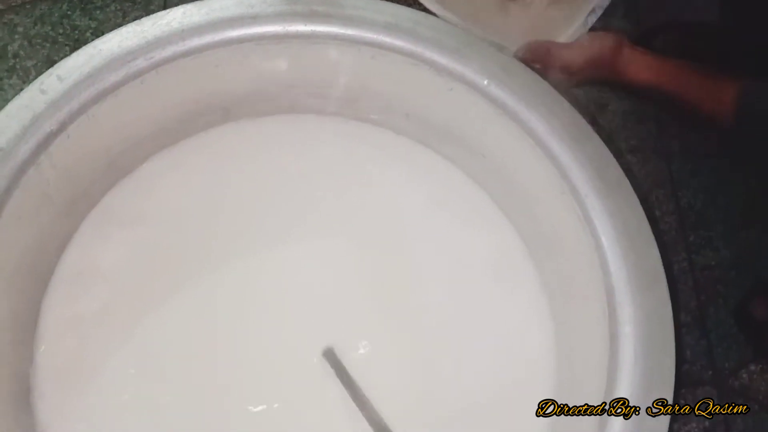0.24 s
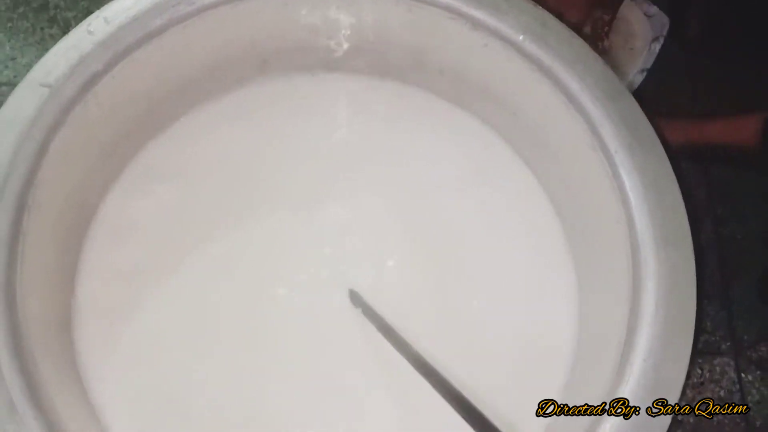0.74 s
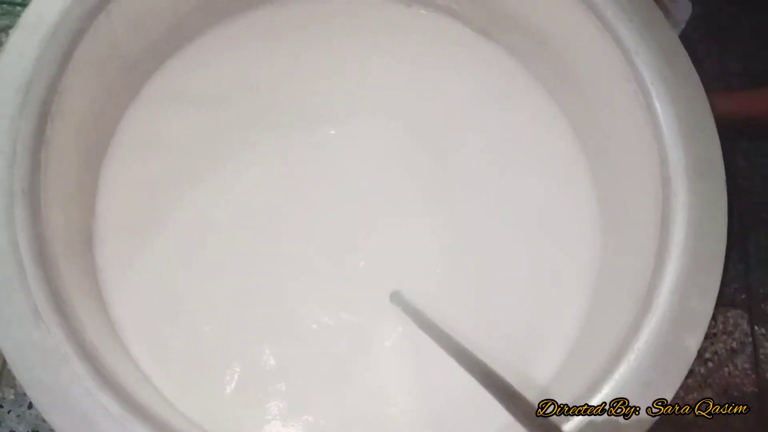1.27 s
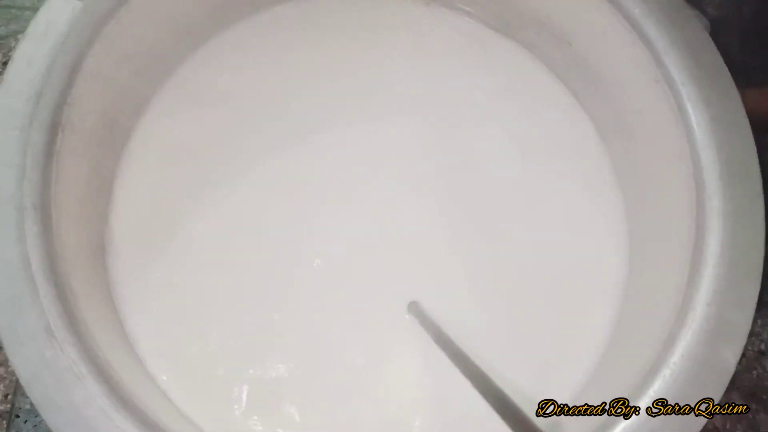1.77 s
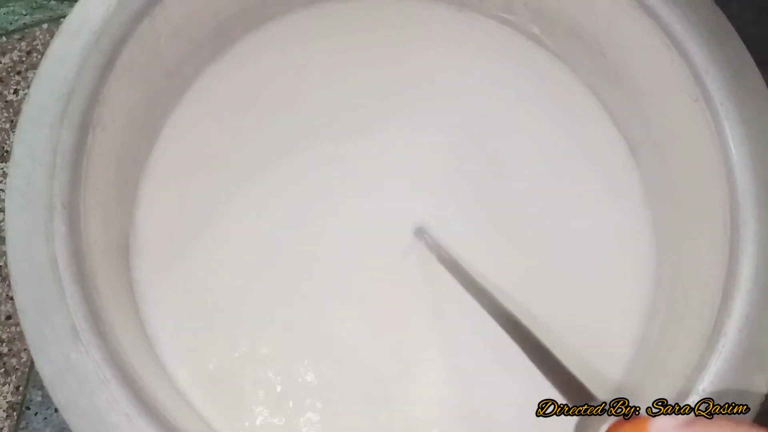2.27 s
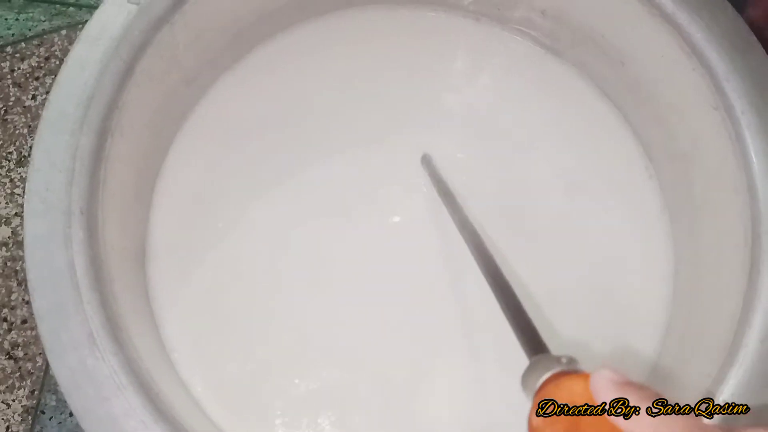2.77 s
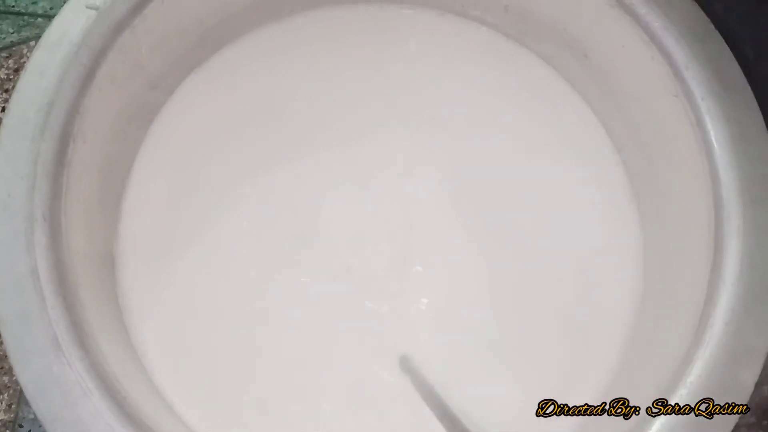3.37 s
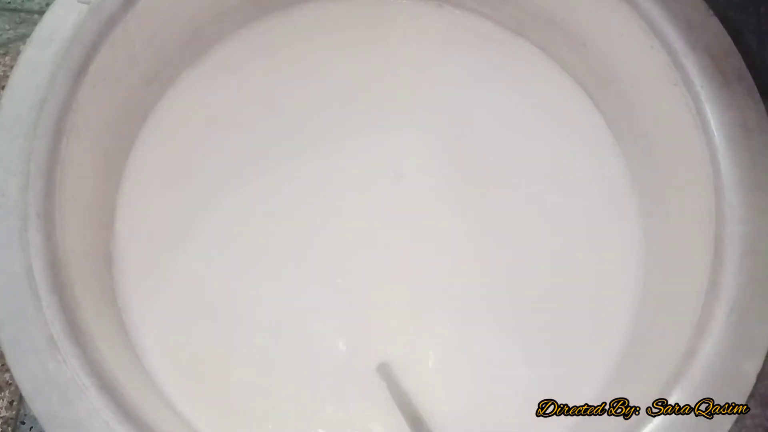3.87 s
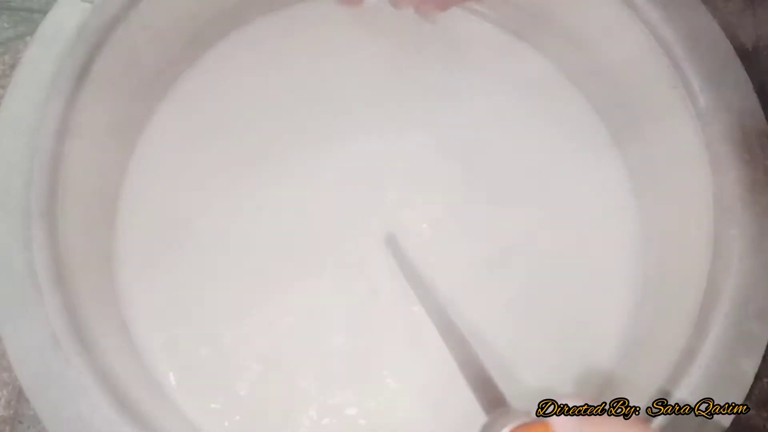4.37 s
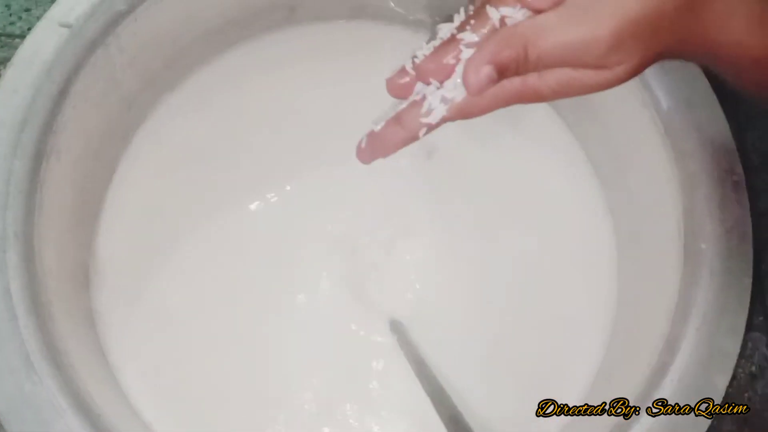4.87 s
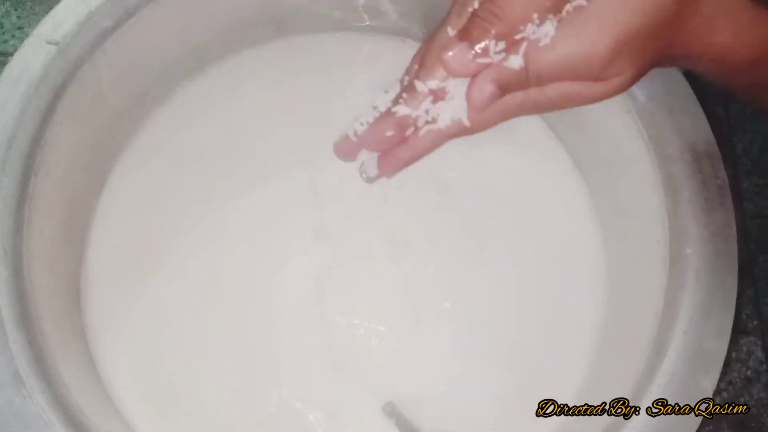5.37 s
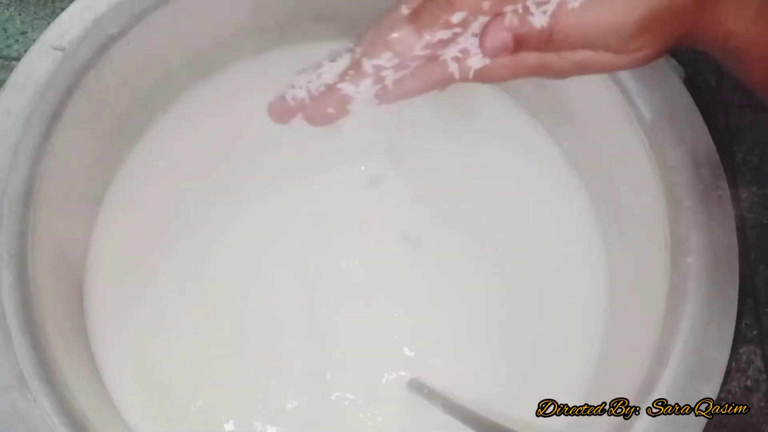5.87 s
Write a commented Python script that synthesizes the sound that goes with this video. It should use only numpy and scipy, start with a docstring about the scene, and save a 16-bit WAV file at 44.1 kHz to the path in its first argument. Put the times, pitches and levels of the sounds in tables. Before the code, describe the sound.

Close stereo pickup in a small hard-walled room. A gas burner hisses steadily over a low pot murmur. A hand rubs wet rice in a metal basin, then knocks ring its rim and a full pot rattles dully. Bumpy sweeps follow, then watery plinks and small taps, more crunchy strokes, sharp clicks between short rubs, and a final sweep running into the end.

```python
"""A small hard-walled room: the steady hiss of a burner and the murmur of a pot of hot milk lie under it all.
Beside the pot a hand sweeps and presses soaked rice in a metal basin: grains crunch, skin judders, clumps splat.
Early knocks ring the rim and rattle the full pot; after the second spell of sweeps, drops plink and the side is tapped.
More strokes follow, then clicks and plinks between short strokes, and a last sweep runs into the end.
Rice is showers of clicks through coloured responses; knocks are decaying modes, drops rising sines, the flame noise."""
import sys
import numpy as np
from scipy import signal
from scipy.fft import rfft, irfft
from scipy.io import wavfile
from scipy.ndimage import uniform_filter1d, map_coordinates

SR = 44100
rng = np.random.default_rng(int(sys.argv[2]) if len(sys.argv) > 2 else 0)


def bounce(signal):
    """Save signal as a 16-bit WAV file at the path given by the first command-line argument."""
    frames = np.transpose(np.atleast_2d(signal))
    limited = np.clip(frames, -1, 1)
    pcm = np.round(limited * 32767).astype(np.int16)
    wavfile.write(sys.argv[1], SR, pcm)


N = 270310
TIME = np.arange(N) / SR   # s
RESPONSE_SIZE = 32768   # samples

# Throughout, left-right dB is positive towards the left, and levels in dB come before the shared trims.

# Diffuse sound at the two microphones. Each row: frequency in Hz, left-right correlation.
DIFFUSE_CORRELATION = [(100, 0.95), (300, 0.76), (700, 0.31), (1300, 0.004), (3000, -0.2), (8000, 0.024)]
# Dying of the small room. Each row: frequency in Hz, time to fall by 60 dB in s.
ROOM_T60 = [(100, 0.47), (260, 0.4), (700, 0.42), (1840, 0.15), (4850, 0.071)]
# Colour of the steady burner. Each row: frequency in Hz, relative density in dB per Hz.
BURNER_COLOUR = [(25, -28), (60, 0.5), (100, 5.5), (160, 6.5), (230, -4.5), (500, -10), (750, -13.5),
                 (1100, -11.5), (1600, -13), (2000, -7.5), (2330, 3.5), (2650, -9), (2950, -3.5),
                 (3400, -14.5), (4400, -13), (5400, -15.5), (6700, -16), (8000, -20), (15000, -44.5)]
# Place of the burner. Each row: frequency in Hz, left-right in dB.
BURNER_PAN = [(100, -0.5), (700, 1.5), (1400, -4.5), (2400, -7), (4500, -7.5), (6700, 3.5)]
BURNER_DB = -51.5
# Faint fizzling ticks in the high treble. Each row: start in seconds, level in dB, decay to 1/e in s.
TICKS = [(1.332, -42, 0.0042), (2.66, -47, 0.071), (3.098, -50, 0.012), (4.924, -41.5, 0.0081),
         (5.301, -37, 0.0061), (5.32, -45, 0.037), (5.362, -49, 0.0027), (5.965, -54, .025)]
# Milk runs off the rice between sweeps. Each row: start in seconds, end in seconds, level in dB.
TRICKLES = [(2.3, 3.203, -60), (2.895, 3.14, -64), (3.188, 3.47, -54), (4.652, 4.943, -64.5),
            (5.27, 5.592, -59.5)]
TRICKLE_FADE_S = 0.02
SQUELCH_DB = -16   # tiny bubbles against the crunch of a sweep
# Drops and clumps that trap air in wet rice and milk; the shortest are mere clicks.
# Each row: start in seconds, bubble pitch in Hz, peak in dB, cycles to fall by 60 dB.
DRIPS = [(0.866, 996, -48, 175.5), (2.808, 1830, -35, 54), (2.89, 1132, -35, 106), (2.908, 1074, -35.5, 62),
         (2.925, 2690, -33, 27), (2.924, 813, -40.5, 69), (2.942, 894, -39, 54), (2.969, 1060, -35, 76),
         (2.985, 1160, -35.5, 58), (3.004, 1070, -43, 70), (3.04, 2980, -35, 33), (3.116, 1084, -39.5, 37),
         (3.174, 1960, -38, 26), (3.278, 2350, -25.5, 30), (3.421, 2560, -28, 30), (3.445, 2630, -26.5, 31),
         (4.048, 1390, -21.5, 21), (4.048, 3920, -27.5, 52), (4.072, 3870, -29.5, 49),
         (4.751, 2970, -22, 9.5), (4.751, 4660, -21.5, 18), (4.912, 1836, -26, 55), (4.934, 1780, -27, 22),
         (4.956, 1410, -25.5, 20), (4.975, 432, -22, 35), (5.362, 2040, -25, 39), (5.363, 3000, -19, 14),
         (5.362, 4800, -11.5, 5)]
# Something hard knocks on the full pot and rattles.
# Each row: start in seconds, level in dB, brightness in dB per octave.
POT_KNOCKS = [(1.583, -23.5, -2.5), (1.595, -40.5, 0), (1.606, -49, 1.5), (1.616, -44, 6),
              (1.627, -49.5, 4.5), (1.641, -43, 0), (1.6565, -36.5, -5.5), (1.672, -39.5, -1),
              (1.686, -50.5, 6), (2.131, -48, -12)]
# Modes of the full pot. Each row: frequency in Hz, level in dB, time to fall by 60 dB in s.
POT_MODES = [(172, -5.5, 0.2), (224, -1.5, 0.11), (302, 0, 0.083), (491, -14, 0.12), (813, 3, 0.065),
             (1064, -8.5, 0.044), (1220, -1.5, .04), (1464, 3.5, 0.052), (1680, -2.5, .04),
             (1870, -4.5, 0.036), (2230, -2, 0.035), (2320, -13.5, 0.03), (2690, -7, 0.032),
             (2830, -25, 0.077)]
# Something small and hard taps the basin's side and bounces.
# Each row: start in seconds, level in dB, brightness in dB per octave.
SIDE_TAPS = [(3.175, -54, 4), (3.2115, -31, 0), (3.216, -38, 4), (3.2305, -39, 8), (3.2355, -43, -1)]
# Modes of the basin's side. Each row: frequency in Hz, level in dB, time to fall by 60 dB in s.
SIDE_MODES = [(306, -15.5, 0.22), (448, -1.5, 0.081), (567, 1.5, 0.039), (1841, 0.5, 0.039),
              (2030, -7, 0.044), (2320, 1.5, 0.036), (2460, -3, 0.023), (2720, -13, .025)]
# Knocks that reach the basin's rim and set its long notes singing.
# Each row: start in seconds, level in dB, brightness in dB per octave, peak of the longest note in dB.
RIM_KNOCKS = [(0.472, -38.5, -5, -33), (0.843, -55.5, 1, -57.5), (1.0942, -35.5, 0.5, -66),
              (1.114, -31.5, -2.5, -39), (4.968, -31, -5, -54)]
# Modes of the rim. Each row: frequency in Hz, level in dB, time to fall by 60 dB in s.
RIM_MODES = [(371.3, -9.5, 0.35), (447.4, 2.5, 0.17), (623, 0, 0.12), (661.4, 3.5, 0.13), (853, -12, 0.31),
             (1251, -1, 0.064), (1705, 2, 0.089), (1850, -10.5, 0.18), (1820, 2, 0.14), (2140, -1, 0.095),
             (2580, -13, 0.13), (2650, -5.5, 0.16), (3700, -7, 0.15)]
RIM_NOTE_HZ, RIM_NOTE_T60_S = 700, 0.61   # its strength depends on where the rim is hit
# A rubbing finger makes one of the basin's notes sing.
# Each row: start in seconds, end in seconds, pitch in Hz, level at the end in dB.
SINGING = [(0.29, 0.454, 730, -43.5), (2.08, 2.107, 2940, -38), (2.355, 2.556, 762, -38),
           (3.783, 3.85, 770, -38.5), (3.822, 3.944, 780, -37.5), (4.427, 4.477, 1793, -37),
           (5.245, 5.326, 710, -47), (5.813, 6.05, 787, -43)]
# The basin's ring under every contact.
# Each row: frequency in Hz, energy in dB before the contact's colour, time to fall by 60 dB in s.
BASIN_MODES = [(177.7, -8, 0.11), (305, -18.5, 0.43), (392.6, -8, 0.047), (580.7, -11, 0.055),
               (710, -9.5, 0.44), (817, -13.5, 0.14), (945, -15.5, 0.06), (1276, -17.5, 0.08),
               (1779, -15, 0.12), (1913, -15.5, 0.14), (2047, -10.5, 0.078), (2407, -9.5, 0.095),
               (2653, -20, 0.06), (2940, -16.5, 0.19), (3790, -25, 0.4)]
# Colours of push, scrape, crunch and fizz, one list each. Each row: frequency in Hz, level in dB.
CONTACT_COLOURS = [
    [(40, -41.5), (95, -15.5), (170, -1.5), (330, 8), (420, 1.5), (500, -1), (590, -8.5), (830, -7),
     (1100, -51), (4000, -85.5)],
    [(300, -28), (480, -10), (620, -1), (790, 1), (980, -8.5), (1300, -5.5), (1520, -12.5), (1800, -11),
     (2300, -61), (7000, -84)],
    [(1100, -35.5), (1550, -25), (1800, 1), (2400, 3), (3000, -2.5), (3500, -12), (5000, -60), (10000, -78)],
    [(2200, -17.5), (3150, -1.5), (3750, 3.5), (4600, 1), (5300, -7.5), (6700, -10.5), (8000, -31.5),
     (10000, -54), (15000, -69)],
]
# Push, scrape, crunch and fizz. Each row: grains per second in the spatter of a blow, spread of their sizes in dB,
# stroke trim in dB, blow trim in dB, near reflections in dB, room in dB, share of the pan from 0 to 1.
CONTACT_RANGES = [(487, 8, -9.5, -0.5, 0, -2, 0.02), (970, 3.5, -9.5, -1, 2, 1.5, 0.09),
                  (1430, 2.5, -5, 2.5, 6.5, 0, 0.94), (1910, 9.5, 0.5, 1.5, 15, 1, 0.8)]
# The hand sweeps through the rice.
# Each row: start in seconds, end in seconds, push in dB, scrape in dB, crunch in dB, fizz in dB.
SWEEPS = [(-0.06, 0.456, -30.5, -29, -30, -49.5), (0.046, 0.428, -65, -49.5, -50, -45),
          (1.887, 2.265, -25, -33.5, -41.5, -55.5), (2.232, 2.722, -27.5, -28, -35, -45),
          (3.415, 3.645, -39.5, -31, -36.5, -49), (3.737, 4.017, -50.5, -29.5, -46, -55),
          (3.897, 4.473, -25, -30.5, -33, -46), (4.247, 4.488, -32.5, -33.5, -66.5, -68),
          (4.407, 4.468, -22, -11, -32.5, -59), (4.968, 5.231, -43, -30.5, -35, -46.5),
          (5.14, 5.298, -34, -47, -58, -70), (5.762, 6.111, -30, -30.5, -37.5, -49.5)]
SWEEP_ATTACK_S, SWEEP_RELEASE_S = 0.091, 0.016
SWEEP_ARCH_DB = 8.5   # a sweep is this much weaker at its ends than in its middle
FIZZ_FADE_DB = 4.5   # the fizz sinks over a sweep
RUB_GRAINS_PER_S, RUB_SPREAD_DB = 8000, 2.0   # a stroke moves many small grains at once
WANDER_S, WANDER_PER_S = 0.000487, 14   # the moving hand makes the rubbed resonances wander: delay spread, rate
STROKE_PAN_DB = -8
# The palm presses down, and wet skin sticks and slips on the basin.
# Each row: start in seconds, end in seconds, pitch in Hz, final level in dB, swell in dB, share of tone from 0 to 1.
PRESSES = [(0.0, 0.323, 401.4, -38, -2.5, 0.6), (0.0, 0.3, 202.4, -41.5, -3.5, 0.15),
           (0.075, 0.388, 579, -47.5, -5, 0.75), (0.407, 0.488, 290.4, -33, -4, 0.15),
           (2.016, 2.173, 140, -39, 7, 0.4), (1.914, 2.185, 222.8, -26.5, -5, 0.22),
           (1.94, 2.035, 325.7, -27.5, -0.5, 0.7), (2.2, 2.6, 172, -39, 10, 0.72),
           (3.435, 3.585, 339.5, -28.5, 15.5, 0.29), (3.777, 3.944, 335, -24.5, 5, 0.16),
           (4.147, 4.455, 606.5, -41.5, 2, 0.8), (4.3, 4.45, 225.5, -18, 9.5, 0.51),
           (5.089, 5.147, 339.3, -30.5, 9, 0.56)]
PRESS_ATTACK_S, PRESS_RELEASE_S = 0.036, 0.048
PRESS_SCRAPE_DB = -17.5   # scrape against the rough part of a press
# Clumps of wet rice land.
# Each row: start in seconds, level in dB, brightness in dB per range, left-right in dB before the range's share.
SPLATS = [(0.471, -25, -0.5, -7.5), (0.8426, -45, 6, -12.5), (1.094, -26.5, 4, -4.5),
          (1.114, -29, -3.5, -5), (1.164, -34.5, -7.5, 0), (1.5834, -31.5, -0.5, -3), (1.598, -34, -3, -1),
          (1.615, -40.5, -4, -6), (1.634, -39, -2, -5), (1.6577, -42, -8, -3), (1.673, -45, -9, 1),
          (3.2115, -34.5, 3, -21), (4.448, -28, -4.5, -15.5), (4.466, -38, -3, -9), (4.9675, -28, -1, -7),
          (4.987, -31.5, -7, -14)]
# The hand bumps the basin.
# Each row: start in seconds, level in dB, brightness in dB per range, left-right in dB before the range's share.
BUMPS = [(1.232, -52, -3, 4.5), (1.954, -36.5, 2, -10), (1.983, -32.5, 5, -8), (1.9925, -30, -3, -11),
         (2.034, -31, -3.5, -0.5), (2.0798, -22, 0, -8), (2.1012, -22, 1.5, -7), (2.131, -27, -4, -10),
         (2.1655, -29, 2, -4), (3.8717, -43.5, 2.5, -16), (3.9131, -33, 2.5, -3), (3.936, -36.5, 4.5, -7.5),
         (4.3955, -31.5, 1.5, -6.5)]
# Single wet grains snap.
# Each row: start in seconds, level in dB, brightness of the fizz in dB, left-right in dB before the range's share.
SNAPS = [(2.6081, -31, -36, -23), (2.9513, -52, -33, -15), (3.099, -58, -3, -5), (3.1748, -47, -27, -8),
         (3.2305, -36, -26, -2), (3.279, -40.5, -17, -1), (3.359, -40.5, -26, -17),
         (3.4212, -47.5, -11, -8), (3.4452, -53, -4, -18), (3.474, -35.5, -16, -11),
         (4.7517, -37.5, -12.5, -4), (4.8684, -75.5, 19, -5), (5.0959, -37.5, -8.5, -10),
         (5.5224, -42, -20, -18)]
# Make-up of a splat: push, scrape, crunch and fizz in dB as a group, then spatter in dB.
SPLAT_KIND = ((-1.5, 0.5, -0.5, -10), -7.5)
# Make-up of a bump: push, scrape, crunch and fizz in dB as a group, then spatter in dB.
BUMP_KIND = ((9.5, -0.5, -6, -19), -22.5)
# Make-up of a snap: push, scrape, crunch and fizz in dB as a group, then spatter in dB.
SNAP_KIND = ((-10.5, -6, -5.5, 5.5), -0.55)
PATTER_PER_S, PATTER_DB = 79, 5   # stray grains fall with a trickle; level against it
PATTER_FIZZ_DB = -6.5   # fizz of a stray grain against its crunch
BASIN_LOW_HZ = 72   # the basin radiates little below this
MIC_LAG_S = .00005   # the left microphone is a little farther from the basin
MIC_CUT_HZ, CUTOFF_HZ = 7500, 15500


def from_db(db):
    """Turns decibels into gain."""
    return 10 ** (np.asarray(db) / 20)


def rms_one(x):
    """Scales a signal to rms 1."""
    return x / np.sqrt(np.mean(x ** 2) + 1e-20)


def at_hz(points, hz):
    """Reads a table on a log-frequency axis."""
    table_hz, value = np.transpose(points)
    return np.interp(np.log(np.maximum(hz, 1)), np.log(table_hz), value)


def panned(left_right_db):
    """Gains of the two channels, mean 1."""
    gains = from_db(np.array([[.5], [-.5]]) * left_right_db)
    return gains / gains.mean()


def drift(rate):
    """Smooth chance of about unit spread, with a new random knot `rate` times a second."""
    knots = rng.standard_normal(8192)
    curve = map_coordinates(knots, [TIME[::32] * rate], order=3, mode="wrap")
    return rms_one(curve).repeat(32)[:N]


def lagged(x, lag_s):
    """Reads a signal shifted by a small, possibly moving lag."""
    return map_coordinates(x, [np.arange(len(x)) - lag_s * SR], order=1)


def envelope(start, end, attack_s, release_s):
    """Straight attack, hold and exponential release."""
    attack = np.clip((TIME - start) / attack_s, 0, 1)
    return attack * np.exp(-np.maximum(TIME - end, 0) / release_s)


def progress(start, end):
    """Runs from 0 to 1 over a gesture."""
    return np.clip((TIME - start) / (end - start), 0, 1)


def grains(per_s, spread_db):
    """Random clicks of uneven size, evened to a local rms near 1."""
    sizes = from_db(spread_db * np.minimum(rng.exponential(1, N), 4)) * rng.choice([-1, 1], N)
    clicks = sizes * (rng.random(N) < per_s / SR)
    local_power = uniform_filter1d(clicks ** 2, size=2048)
    return clicks / np.sqrt(np.maximum(local_power, 1e-4))


def diffuse(size):
    """Frequencies and spectrum of stereo noise: alike in the bass, nearly unrelated in the treble."""
    hz = np.fft.rfftfreq(size, 1 / SR)
    alike = np.clip(at_hz(DIFFUSE_CORRELATION, hz), -1, 1)
    mid, side = rfft(rng.standard_normal((2, size)))
    mid = np.sqrt(1 + alike) * mid
    side = np.sqrt(1 - alike) * side * [[1], [-1]]
    return hz, (mid + side) / np.sqrt(2)


def room_tail(build_s=0.00024):
    """Reflections from pot and walls, dying faster in the treble; energy about 1 a channel."""
    t = np.arange(RESPONSE_SIZE) / SR
    hz, noise = diffuse(RESPONSE_SIZE)
    edges = np.r_[0, 125 * 2. ** np.arange(7), SR]
    tail = 0
    for low, high in zip(edges, edges[1:]):
        t60 = at_hz(ROOM_T60, (low + high) / 2)
        decay = from_db(-60 * t / t60) * (1 - np.exp(-t / build_s))
        band = irfft(noise * (hz >= low) * (hz < high))
        tail = tail + band * decay / np.linalg.norm(decay)
    return tail


def with_room(x, tail, room_db):
    """A mono sound and its reflections, in stereo."""
    return x + from_db(room_db) * signal.fftconvolve(tail, x[None], axes=1)[:, :N]


def burner(flicker_db=3.5, waver_db=2.0, waver_below_hz=1900):
    """Flame: the hiss of the gas jet over a rush that wavers octave by octave, all flickering in level."""
    hz, noise = diffuse(N)
    balance = from_db(at_hz(BURNER_PAN, hz) * np.array([[.5], [-.5]]))
    spectrum = noise * from_db(at_hz(BURNER_COLOUR, hz)) * balance
    flame = irfft(spectrum, N)
    steady_rms = flame.mean(0).std()
    for top in waver_below_hz / 2. ** np.arange(4):
        octave = irfft(spectrum * (hz >= top / 2) * (hz < top), N)
        flame = flame + octave * (from_db(waver_db * drift(11)) - 1)
    return from_db(BURNER_DB + flicker_db * drift(15)) * flame / steady_rms


def simmer(level_db=-61.0, low_hz=100, high_hz=195, swell_db=12.5):
    """The heating pot murmurs: a low noise band in uneven swells."""
    band = signal.butter(2, [low_hz, high_hz], "band", fs=SR, output="sos")
    rumble = signal.sosfilt(band, rng.standard_normal(N))
    swells = from_db(swell_db * np.tanh(drift(8.8)))
    return from_db(level_db) * rms_one(rumble * swells)


def ticks(low_hz=7500, pan_db=6.0, per_s=1500):
    """Faint, thin ticks in the high treble: high-passed random clicks that start at once and die."""
    level = np.zeros(N)
    for s, db, decay_s in TICKS:
        level += (TIME >= s) * from_db(db) * np.exp(-np.abs(TIME - s) / decay_s)
    clicks = level * grains(per_s, spread_db=-4.0) * rng.standard_normal((2, N))
    high = signal.butter(4, low_hz, "high", fs=SR, output="sos")
    return panned(pan_db) * signal.sosfilt(high, clicks)


def trickle():
    """Strength of the milk's run-off between sweeps."""
    return sum(from_db(db) * envelope(start, end, TRICKLE_FADE_S, TRICKLE_FADE_S)
               for start, end, db in TRICKLES)


def dribble(tail, per_s=220, low_hz=1600, high_hz=4800, cycles=28, room_db=-10.5, count=24):
    """Tiny bubbles burst between wet grains: clicks dealt at random to short resonators of various pitch."""
    pops = grains(per_s, spread_db=-11.0)
    dealt = rng.integers(0, count, N)
    bubbles = np.zeros(N)
    for k, hz in enumerate(np.geomspace(low_hz, high_hz, count)):
        # each bubble falls by 60 dB in the given cycles
        radius = from_db(-60 * hz / (cycles * SR))
        angle = 2 * np.pi * hz / SR
        poles = [1, -2 * radius * np.cos(angle), radius * radius]
        bubbles += signal.lfilter([0, np.sin(angle)], poles, pops * (dealt == k) + 1e-18)
    _, _, crunch, _ = sweeps()
    bubbles = rms_one(bubbles) * np.hypot(from_db(SQUELCH_DB) * crunch, trickle())
    return panned(STROKE_PAN_DB) * with_room(bubbles, tail, room_db)


def drips(tail, rise=0.016, onset_cycles=1.27, room_db=-6.0, pan_db=-7.0):
    """Each drop traps a bubble whose note swells in about a cycle and rises a little as it dies."""
    out, t = np.zeros(N), TIME[:SR // 5]
    for s, hz, peak_db, cycles in DRIPS:
        at, t60 = int(s * SR), cycles / hz
        phase = 2 * np.pi * hz * t * (1 + rise * t / t60)
        onset = 1 - np.exp(-(hz * t / onset_cycles) ** 2)
        out[at:at + len(t)] += np.sin(phase) * from_db(peak_db - 60 * t / t60) * onset
    return panned(pan_db) * with_room(out, tail, room_db)


def struck(knocks, modes, uneven_db=3.0):
    """Every knock rings each mode a little differently; brighter knocks favour the high ones."""
    out, t = np.zeros(N), TIME[:SR]
    hz, mode_db, t60 = np.transpose(modes)
    rings = from_db(-60 * t / t60[:, None]) * np.sin(2 * np.pi * hz[:, None] * t)
    octaves = np.log2(hz / 700)
    signs = (-1) ** np.arange(len(hz))
    for s, level_db, bright_db, *_ in knocks:
        at = int(s * SR)
        chance_db = uneven_db * rng.standard_normal(len(hz))
        strengths = signs * from_db(level_db + mode_db + bright_db * octaves + chance_db)
        out[at:at + len(t)] += (strengths @ rings)[:N - at]
    return out


def rim_note():
    """The rim's longest note hums on after each knock."""
    out = np.zeros(N)
    for s, _, _, note_db in RIM_KNOCKS:
        t = np.maximum(TIME - s, 0)
        out += np.sin(2 * np.pi * RIM_NOTE_HZ * t) * from_db(note_db - 60 * t / RIM_NOTE_T60_S)
    return out


def clanks(tail, rim_pan_db=-1.5, pot_pan_db=1.0, tap_pan_db=-5.5, note_pan_db=-6.5, room_db=-4.5):
    """The thin basin rings long at its rim and briefly at its side; the pot is damped by its milk."""
    rim = panned(rim_pan_db) * with_room(struck(RIM_KNOCKS, RIM_MODES), tail, room_db)
    rim = rim + panned(note_pan_db) * rim_note()
    pot = panned(pot_pan_db) * with_room(struck(POT_KNOCKS, POT_MODES), tail, room_db)
    taps = panned(tap_pan_db) * with_room(struck(SIDE_TAPS, SIDE_MODES), tail, room_db)
    return rim + pot + taps


def singing(release_s=0.036, waver=0.016, flutter_db=3.0, pan_db=0.0):
    """Friction of a finger feeds a note slowly; it rings out when the finger lifts."""
    out = np.zeros(N)
    for start, end, hz, level_db in SINGING:
        growth = np.sqrt(np.clip((TIME - start) / max(end - start, .01), 0, 1))
        swell = growth * np.exp(-np.maximum(TIME - end, 0) / release_s)
        phase = 2 * np.pi * np.cumsum(hz * (1 + waver * drift(90))) / SR
        out += np.sqrt(2) * swell * np.sin(phase) * from_db(level_db + flutter_db * drift(70))
    return panned(pan_db) * out


def causal(colour):
    """Minimum-phase impulse response of a colour, by folding its cepstrum."""
    hz = np.fft.rfftfreq(RESPONSE_SIZE, 1 / SR)
    cepstrum = irfft(np.log(from_db(at_hz(colour, hz))))
    cepstrum[1:RESPONSE_SIZE // 2] *= 2
    cepstrum[RESPONSE_SIZE // 2 + 1:] = 0
    return irfft(np.exp(rfft(cepstrum)))


def response(colour, near_db, room_db, tail, near_s=0.0057):
    """One contact: its colour, reflections from the curved metal nearby, room and basin ring; energy 1."""
    t = np.arange(RESPONSE_SIZE) / SR
    near = irfft(diffuse(RESPONSE_SIZE)[1]) * np.exp(-t / near_s)
    near = near / np.linalg.norm(near, axis=1, keepdims=True)
    paths = from_db(near_db) * near + from_db(room_db) * tail
    # direct sound at the left and right microphones
    paths[0, int(MIC_LAG_S * SR)] += 1
    paths[1, 0] += 1
    # reflections ripple the spectrum finely and leave its broad colour alone
    paths = rfft(paths)
    paths /= np.sqrt(uniform_filter1d(np.abs(paths) ** 2, size=200, axis=1))
    end_fade = np.minimum(10 * (1 - t / t[-1]), 1) ** 2
    contact = irfft(paths * rfft(causal(colour))) * end_fade
    out = contact / np.linalg.norm(contact, axis=1, keepdims=True)
    for hz, level_db, t60 in BASIN_MODES:
        # each mode follows the contact that drives it, so high ones reach the two microphones out of step
        phase = np.angle(contact @ np.exp(-2j * np.pi * hz * t))[:, None]
        ring = np.cos(2 * np.pi * hz * t + phase) * from_db(-60 * t / t60)
        out = out + from_db(level_db + at_hz(colour, hz)) * ring / np.linalg.norm(ring[0])
    return out / np.linalg.norm(out, axis=1, keepdims=True)


def judder(waver=0.0262, flutter_db=0.5):
    """A pressing palm slips partly in rhythm: its wavering tone and the strength of its rough rubbing."""
    tone, rough = np.zeros((2, N))
    for start, end, hz, level_db, swell_db, share in PRESSES:
        swell = from_db(level_db + swell_db * (progress(start, end) - 1))
        force = envelope(start, end, PRESS_ATTACK_S, PRESS_RELEASE_S) * swell
        share = np.clip(share, 0, 1)
        phase = 2 * np.pi * np.cumsum(hz * (1 + waver * drift(70))) / SR
        tone += force * np.sqrt(2 * share) * np.sin(phase) * from_db(flutter_db * drift(40))
        rough += force * np.sqrt(1 - share)
    return tone, rough


def sweeps():
    """Strength of push, scrape, crunch and fizz as the hand speeds up and slows down."""
    levels = np.zeros((4, N))
    for start, end, *levels_db in SWEEPS:
        way = 2 * progress(start, end) - 1   # -1 at the start, 1 at the end
        arch = from_db(-SWEEP_ARCH_DB * way ** 2)
        speed = envelope(start, end, SWEEP_ATTACK_S, SWEEP_RELEASE_S) * arch
        stroke = np.outer(from_db(levels_db), speed)
        stroke[-1] *= from_db(-FIZZ_FADE_DB * way / 2)
        levels += stroke
    return levels


def blows(column, pan_share, scatter, contact_s=0.0051, spatter_s=0.041):
    """Each blow is one click and a dying shower of small ones, set for one range from push to fizz."""
    out, t = np.zeros((2, N)), TIME[:SR // 4]
    shower = np.exp(-t / spatter_s)
    shower /= np.linalg.norm(shower)
    # brightness tilts splats and bumps about the scrape, and lifts or lowers only the fizz of snaps
    kinds = (
        (SPLATS, SPLAT_KIND, column - 1),
        (BUMPS, BUMP_KIND, column - 1),
        (SNAPS, SNAP_KIND, max(column - 2, 0)),
    )
    for rows, (colour_db, spatter_db), tilt_steps in kinds:
        for s, level_db, bright_db, pan_db in rows:
            at = int(s * SR)
            size = min(len(t), N - at)
            blow = from_db(spatter_db) * shower[:size] * scatter[at:at + size]
            blow[0] += 1
            strength = from_db(level_db + colour_db[column] + bright_db * tilt_steps)
            gain = strength * np.sqrt(contact_s * SR)
            out[:, at:at + size] += gain * blow * panned(pan_db * pan_share)
    return out


def rice(tail, judder_db=0.0, palm_s=0.001013, palm_sway=0.12, palm_echo=0.33, uneven_db=2.0):
    """Strokes and blows shake grains against the basin, from the dull push up to the wet fizz."""
    tone, rough = judder()
    push, scrape, crunch, fizz = sweeps()
    pressed_scrape = np.hypot(scrape, from_db(PRESS_SCRAPE_DB) * rough)
    levels = np.hypot(push, rough), pressed_scrape, crunch, fizz
    lumps = from_db(uneven_db * drift(45))
    patter = from_db(PATTER_DB) * trickle() * grains(PATTER_PER_S, spread_db=-3.0)
    strays = 0, 0, patter, from_db(PATTER_FIZZ_DB) * patter
    wander_s = WANDER_S * drift(WANDER_PER_S)
    palm_lag_s = palm_s * np.exp(palm_sway * drift(3.4))
    out = from_db(judder_db) * tone
    for k, (colour, settings) in enumerate(zip(CONTACT_COLOURS, CONTACT_RANGES)):
        per_s, spread_db, stroke_db, hit_db, near_db, room_db, pan_share = settings
        scatter = grains(per_s, spread_db)
        rubbing = lumps * grains(RUB_GRAINS_PER_S, RUB_SPREAD_DB)
        rub = from_db(stroke_db) * levels[k] * rubbing + strays[k]
        if k >= 2:
            # the echo from the moving palm sweeps soft ridges through crunch and fizz
            rub = (rub + palm_echo * lagged(rub, palm_lag_s)) / np.hypot(1, palm_echo)
        contact = response(colour, near_db, room_db, tail)
        stroke = rub * panned(STROKE_PAN_DB * pan_share)
        rubbed = signal.fftconvolve(stroke, contact, axes=1)[:, :N]
        rubbed = np.array([lagged(side, wander_s) for side in rubbed])
        hit = signal.fftconvolve(blows(k, pan_share, scatter), contact, axes=1)[:, :N]
        out = out + rubbed + from_db(hit_db) * hit
    return out


def scene():
    """The pot on its burner; drops, dribble and faint high-treble ticks; and the hand in the basin."""
    tail = room_tail()
    background = simmer() + burner()
    small_sounds = drips(tail) + dribble(tail) + ticks()
    basin = rice(tail) + singing() + clanks(tail)
    low_cut = signal.butter(2, BASIN_LOW_HZ, "high", fs=SR, output="sos")
    return signal.sosfilt(low_cut, basin + small_sounds) + background


def record(dry, leak_db=-16.0):
    """The microphone passes little above its voice band; the very top is cut."""
    voice_filter = signal.cheby1(10, .2, MIC_CUT_HZ, fs=SR, output="sos")
    above_filter = signal.butter(4, MIC_CUT_HZ, "high", fs=SR, output="sos")
    top_cut = signal.ellip(10, .1, 80, CUTOFF_HZ, fs=SR, output="sos")
    voice_band = signal.sosfilt(voice_filter, dry)
    above = signal.sosfilt(above_filter, dry)
    return signal.sosfilt(top_cut, voice_band + from_db(leak_db) * above)


dry = scene()
out = record(dry)
bounce(out)
```